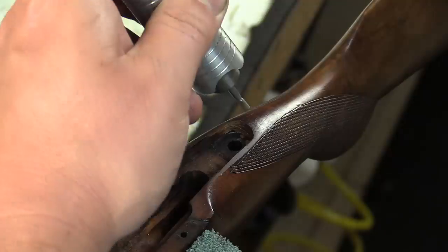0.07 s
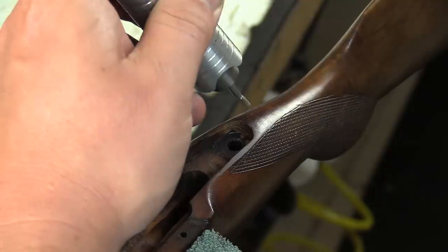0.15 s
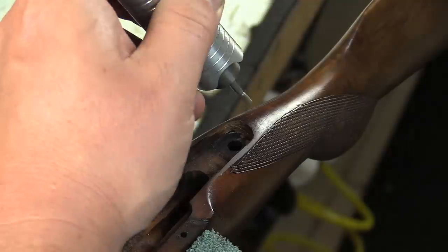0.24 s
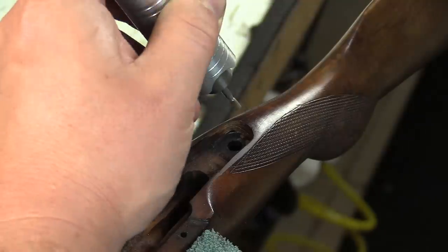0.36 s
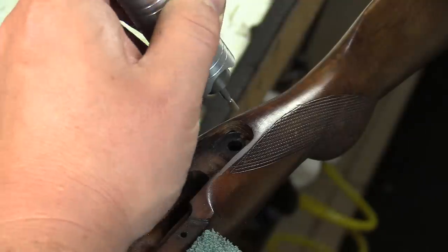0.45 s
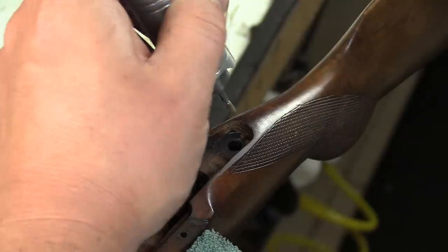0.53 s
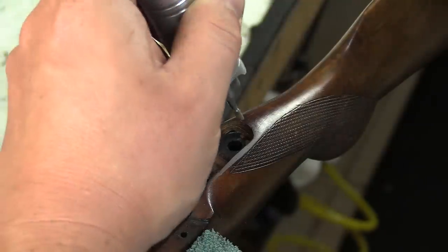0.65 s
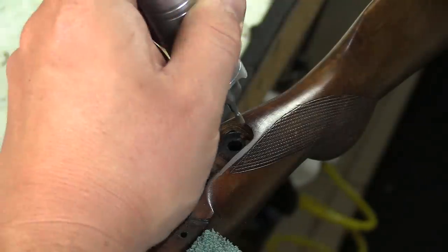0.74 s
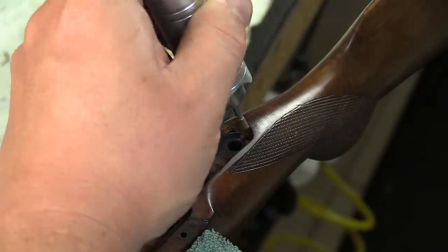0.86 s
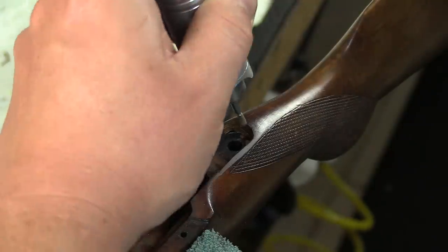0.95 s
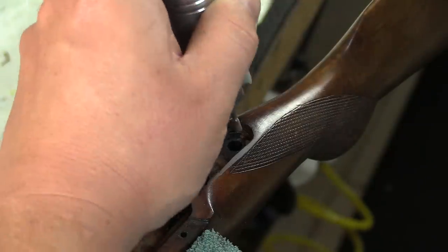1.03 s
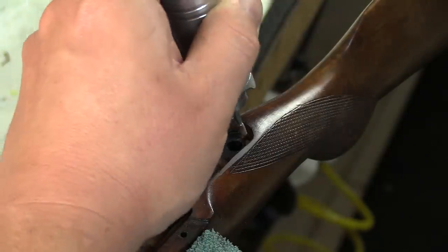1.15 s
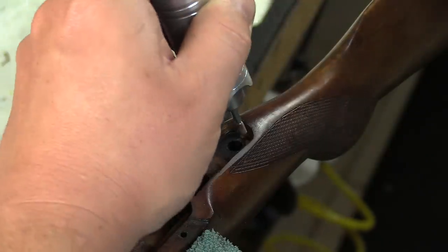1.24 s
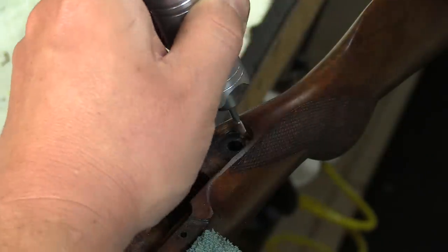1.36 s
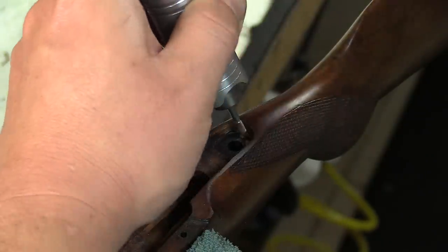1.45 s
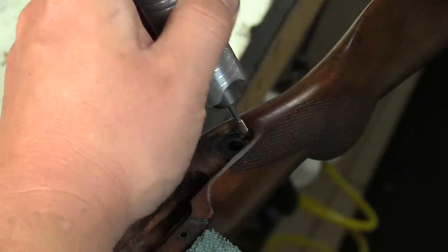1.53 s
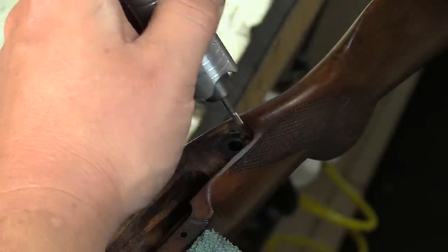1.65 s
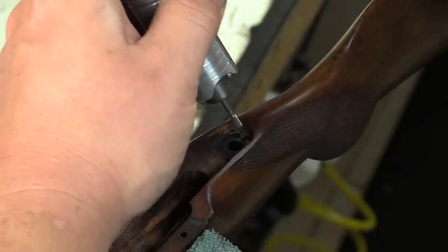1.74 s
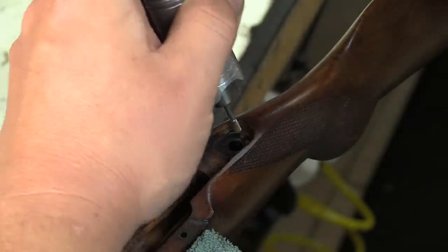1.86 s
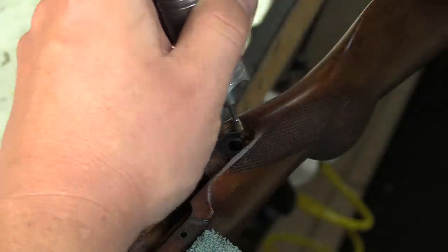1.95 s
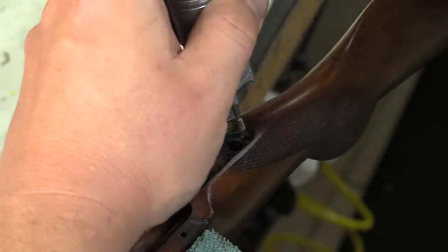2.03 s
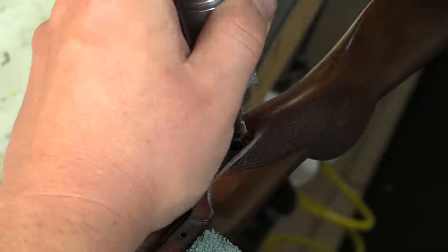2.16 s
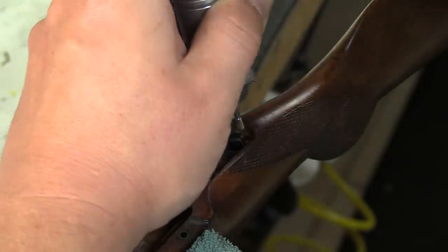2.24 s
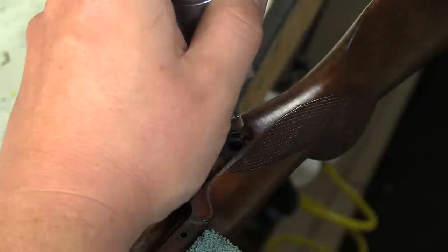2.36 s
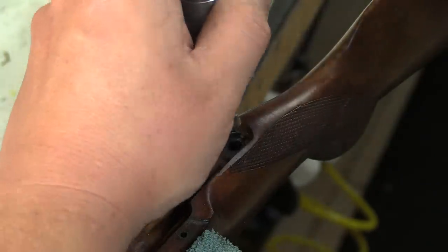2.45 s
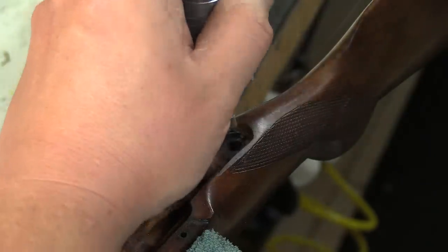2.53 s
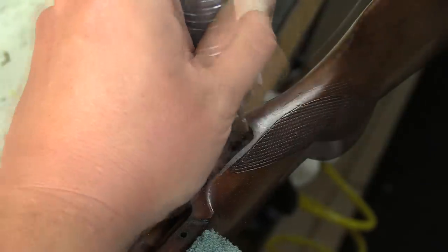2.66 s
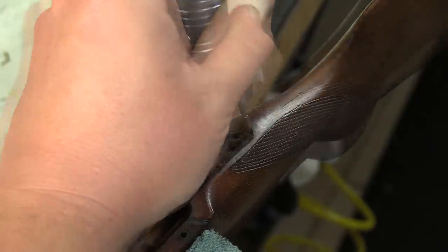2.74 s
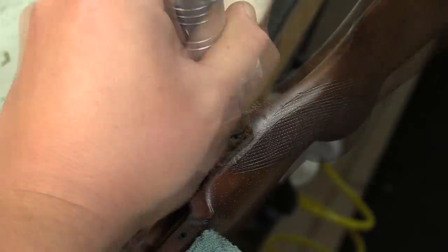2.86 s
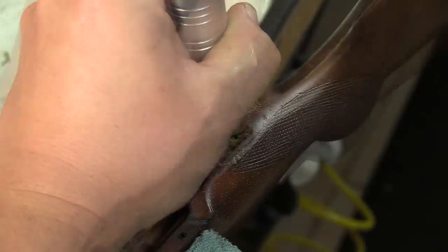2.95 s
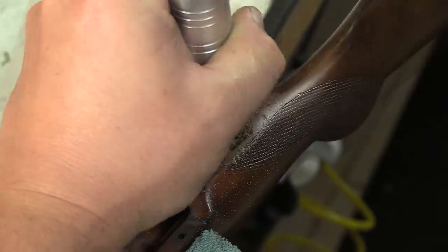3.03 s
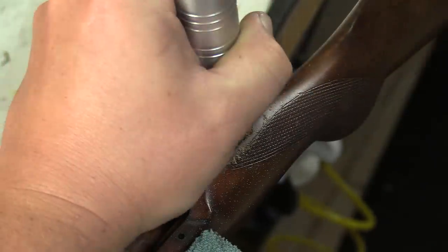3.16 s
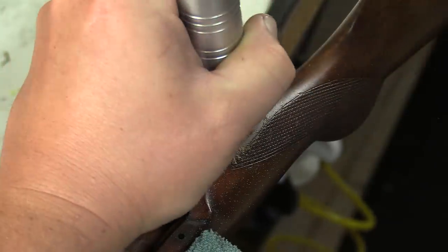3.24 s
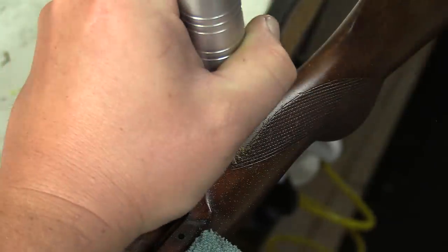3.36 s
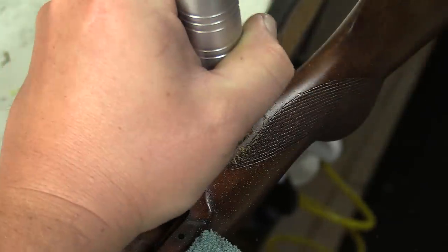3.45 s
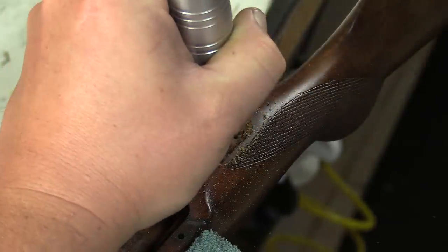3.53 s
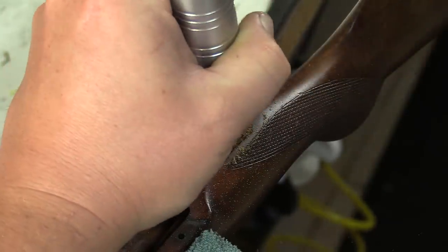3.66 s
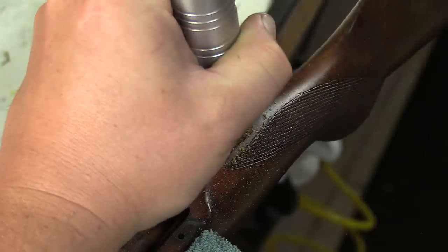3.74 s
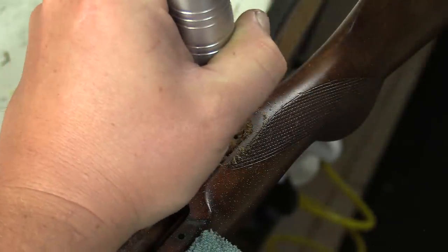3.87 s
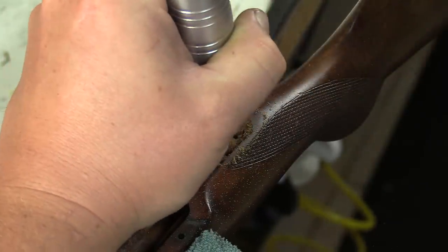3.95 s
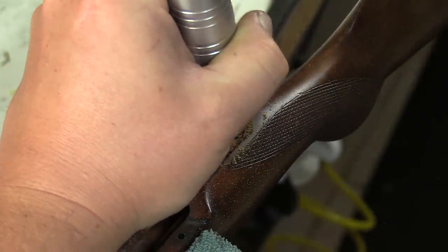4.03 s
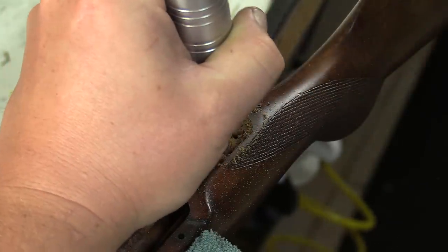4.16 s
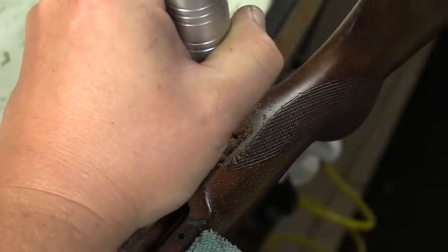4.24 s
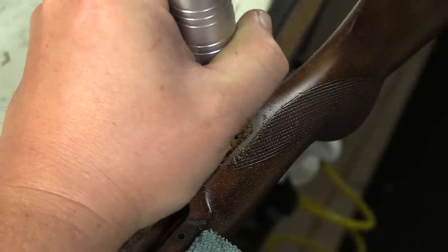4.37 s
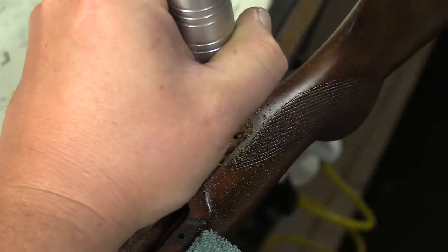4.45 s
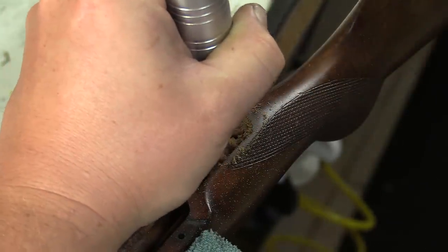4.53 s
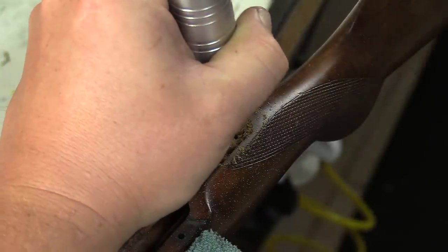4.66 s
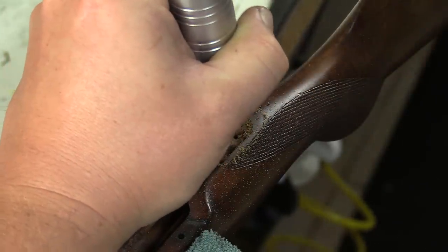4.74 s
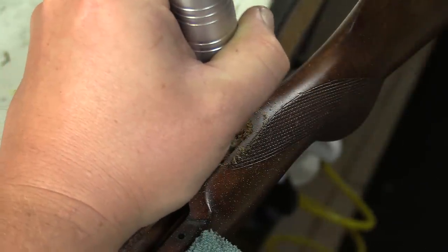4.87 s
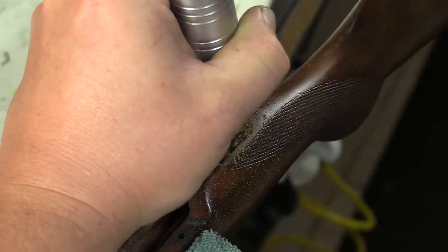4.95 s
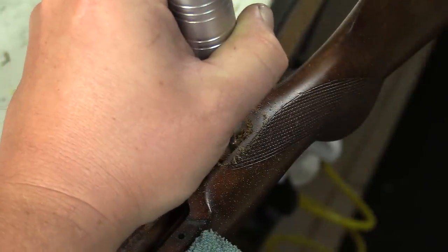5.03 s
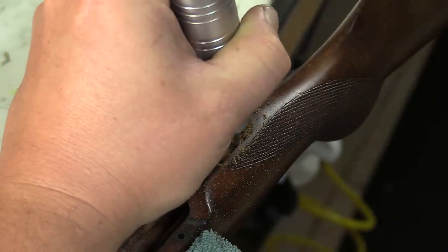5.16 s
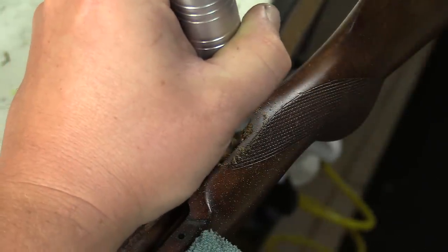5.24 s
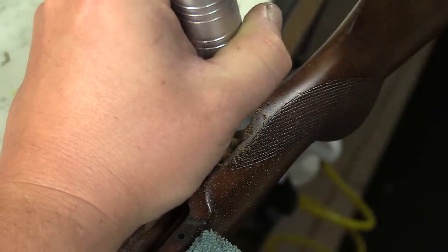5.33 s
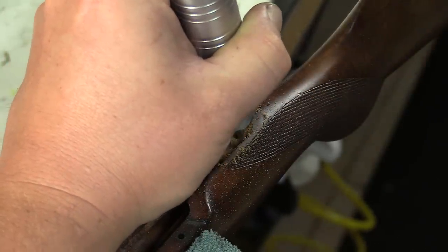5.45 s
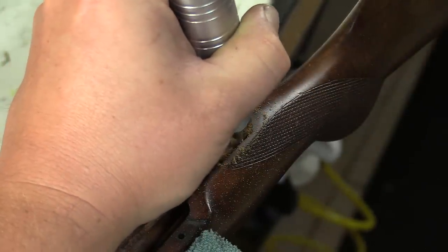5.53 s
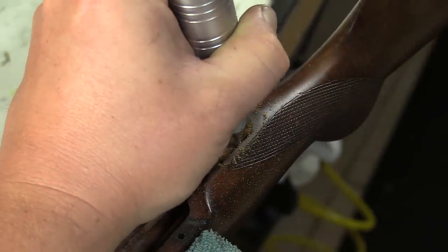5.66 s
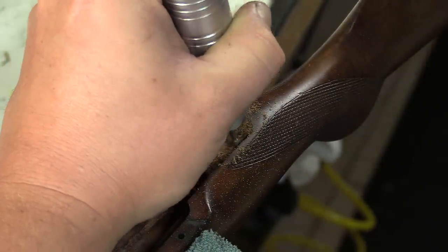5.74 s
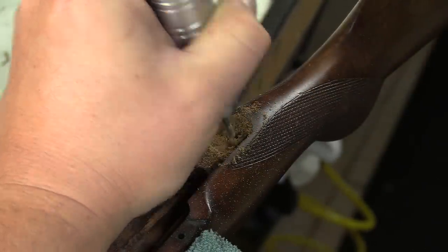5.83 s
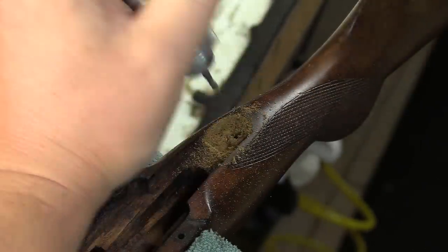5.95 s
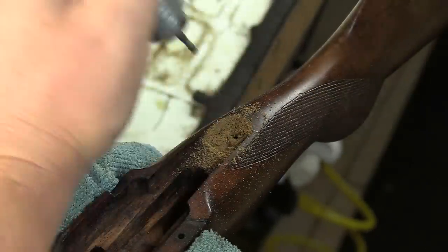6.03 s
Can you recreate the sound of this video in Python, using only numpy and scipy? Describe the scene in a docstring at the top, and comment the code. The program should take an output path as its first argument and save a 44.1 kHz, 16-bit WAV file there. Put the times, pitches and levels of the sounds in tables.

```python
"""Rotary tool carving wood

A hand-held rotary tool grinds a recess into a wooden stock, over a faint rumble.
First the motor creeps up to speed, its air hissing, as the burr skims the wood; this blends into a deep cut.
The motor is a stack of sines on its shaft orders; hiss, fizz and rasp are coloured noise pulsing once a turn.
Chatter and squeals are wavering sines locked to the burr; bites add buzzing scrapes and thuds."""
import sys
import numpy as np
from scipy import signal
from scipy.fft import rfft, irfft, next_fast_len
from scipy.io import wavfile
from scipy.ndimage import map_coordinates

SR = 44100
rng = np.random.default_rng(int(sys.argv[2]) if len(sys.argv) > 2 else 0)


def unload_wav(signal):
    """Save mono or channel-first audio to the path in sys.argv[1] as 16-bit WAV at rate SR, clipped to [-1, 1]."""
    wavfile.write(
        sys.argv[1],
        SR,
        np.round(np.clip(np.atleast_2d(signal).T, -1, 1) * 32767).astype(np.int16),
    )


N = 268789
TIME = np.arange(N) / SR  # seconds

# In these tables a half length is the spread of a bell-shaped swell. Colours are rescaled to rms 1 in use.
# Shaft orders as the motor gains speed. Each row: multiple of the turn (sounded at the nearest
# whole number), level at the start in dB, level change in dB per second.
RISING_ORDERS = [(1, -47.5, -3), (2, -51, 0.5), (4, -52, 2), (5, -51.5, 0), (6.03, -50.5, 1),
                 (6.85, -47.5, 0), (8, -49, 0), (12.1, -45, -1.5), (13, -51, 0), (18, -52, 0),
                 (22.1, -50.5, 1)]
# Shaft orders at full speed. Each row: multiple of the turn, level in dB.
FULL_ORDERS = [(1, -43.5), (2, -49.5), (3, -44.5), (4, -49), (5, -46.5), (6, -46), (12, -45), (13, -43.5),
               (44, -50)]
# The shrill order at full speed. Each row: time in seconds, level in dB.
SHRILL_LEVEL = [(4.4, -47), (5.0, -35), (5.5, -34), (6.09, -44)]
# Housing resonances the rising orders sweep through. Each row: centre in Hz, width in Hz, lift in dB.
HOUSING_MODES = [(583, 8.1, 6), (1775, 39, 6), (3180, 100, 7), (5780, 130, 11), (5870, 50, 5)]
# How deep the burr sits in the wood. Each row: time in seconds, depth from 0 to 1.
DEPTH = [(0.4, 0), (1.72, 0.24), (1.98, 0.5), (2.3, 0.45), (2.6, 0.85), (2.9, .78), (3.5, 0.97), (5.66, 1),
         (6.07, 0.42)]
# How far the hand covers the tool's nose in the light cut. Each row: time in seconds, cover from 0 to 1.
COVER = [(0, 0.1), (.33, 0.1), (.7, 0.86), (1.2, 0.96), (1.7, 0.25), (2.05, .5), (2.5, 0.8)]
# Wood and housing under each cut. Each row: frequency in Hz, relative level in dB per Hz.
LIGHT_BODY = [(25, -8.5), (100, -13), (165, -9.5), (230, -12), (400, -7), (700, -6), (1010, -1),
              (1500, -4.5), (2500, -3), (3250, -5.5), (4880, -7.5), (7500, -5.5), (9750, -36), (16000, -90)]
DEEP_BODY = [(25, -10.5), (100, -12.5), (170, -8), (260, -11.5), (420, -8), (720, -6.5), (1010, -3),
             (1590, -5), (2000, -6), (3000, -6), (5000, -9.5), (7500, -2), (9750, -28), (16000, -90)]
# Resonances of wood and housing. Each row: centre in Hz, width in Hz, lift in dB.
LIGHT_MODES = [(863, 46, 7.5), (1021, 63, 8.5), (1404, 98, -7), (1770, 190, 6), (2280, 90, -2.5),
               (2520, 120, -6.5), (6530, 180, -0.5)]
DEEP_MODES = [(582, 34, 7.5), (880, 100, 4.5), (1028, 67, 8), (1092, 22, 6), (1230, 17, 6.5),
              (1847, 120, 9), (1960, 60, 5), (2550, 230, -3.5), (2770, 150, 4), (5466, 41, 10.5),
              (6000, 340, 5)]
# The burr's hiss and its higher fizz. Each row: frequency in Hz, relative level in dB per Hz.
LIGHT_HISS = [(5500, -55), (7000, -17), (7700, -2.5), (8200, -1), (8420, 4.5), (8700, 1.5), (9500, 0.5),
              (10100, -3), (11000, -15), (12500, -60)]
DEEP_HISS = [(5500, -49), (7200, -38), (7700, -9.5), (8250, -3), (8520, 4), (8900, 1), (9500, -0.5),
             (10100, -9), (11000, -33), (12500, -60)]
LIGHT_FIZZ = [(8500, -60), (9900, -18), (10600, -1), (11300, 1.5), (11800, -0.5), (12250, -5), (12900, 1.5),
              (13700, -6), (14500, -2.5), (15200, -14), (16000, -23)]
DEEP_FIZZ = [(8500, -60), (9900, 4), (10400, 1.5), (10950, 2), (11330, 3), (11950, -4), (12600, 1.5),
             (13350, 7), (13900, 2.5), (14400, 0), (15100, -8), (16000, -9)]
# Bands shaped by the gap under the palm. Each row: centre open in Hz, centre covered in Hz,
# width in Hz, lift open in dB, lift covered in dB.
PALM_BANDS = [(4440, 5200, 420, 3, -6.5), (7400, 6800, 350, 5.5, -3.5), (9500, 10300, 320, -4, 4),
              (13800, 15200, 510, 4, -1.5)]
# Bands shaped by the mouth of the recess as the burr first sinks in, then by the recess itself.
# Each row: centre lifted in Hz, centre sunk in Hz, width in Hz, lift lifted in dB, lift sunk in dB.
MOUTH_BANDS = [(4440, 4500, 190, 1.5, -2), (5550, 5950, 420, -0.5, 8), (8400, 8400, 430, -1.5, 1.5),
               (11500, 10600, 500, 1.5, 1.5), (14700, 14000, 450, 1, -6)]
RECESS_BANDS = [(6070, 7300, 220, 7.5, 0), (6900, 6900, 390, -3, -3.5), (10600, 10050, 350, 3.5, -2),
                (12200, 14400, 610, -6, -6.5)]
# Partials of the rattle. Each row: multiple of the burr's turn, relative level in dB.
CHATTER_ORDERS = [(2, -21.5), (3, -2.5), (6, -7.5), (8, -11), (16, -20), (25, -0.5)]
# Bouts of the burr rattling in its hole. Each row: time in seconds, half length in seconds, level in dB.
RATTLES = [(2.884, 0.025, -33), (3.058, .028, -31.5), (3.367, 0.095, -36), (3.658, .022, -35),
           (5.093, 0.017, -35), (5.423, 0.032, -37), (5.559, 0.079, -37)]
# Short squeals of the burr. Each row: time in seconds, half length in seconds, level in dB,
# multiple of the turn.
SQUEALS = [(2.68, .05, -45, 8), (3.097, .03, -37, 8), (3.273, 0.014, -31.5, 8), (3.33, 0.018, -34, 8),
           (3.412, 0.022, -31.5, 8), (3.654, 0.014, -36, 8), (4.038, 0.014, -36, 8), (4.54, 0.017, -34, 16),
           (4.782, 0.011, -31, 17), (5.432, 0.02, -33, 8)]
# The burr catches the wall. Each row: time in seconds, half length in seconds, scrape level in dB,
# thud level in dB.
BITES = [(3.199, 0.0143, -19, -54), (3.254, 0.022, -20, -40.5), (3.378, 0.026, -12, -33.5),
         (3.72, 0.028, -17, -40), (3.774, 0.0165, -20.5, -58), (4.041, 0.018, -28, -40.5),
         (4.068, 0.016, -27, -55)]
# Spectra of scrape and thud. Each row: frequency in Hz, relative level in dB per Hz.
BITE_COLOUR = [(3000, -17), (5000, -16.5), (6600, -11), (7300, -7.5), (8000, 1.5), (8700, -1), (9600, 0.5),
               (11500, -3), (13300, -3.5), (15500, -17)]
THUD_COLOUR = [(25, -10), (70, -1), (170, 1), (500, 3), (1500, -16), (4000, -25), (8000, -40)]
# Soft knocks as the tool is lifted. Each row: start in seconds, level in dB.
KNOCKS = [(5.912, -23), (5.974, -18), (6.0, -21)]
# Spectrum of the background rumble. Each row: frequency in Hz, relative level in dB per Hz.
RUMBLE_COLOUR = [(20, -9), (45, -2), (85, -6.5), (300, -50)]
# The hand shifts its grip and rumbles. The row: time in seconds, half length in seconds, lift in dB.
REGRIP = (2.6, 0.16, 6.9)

FULL_HZ, WANDER_HZ = 336.25, 0.3  # turns per second at full speed, and their slow drift
SAG_FROM_S, SAG_HZ_PER_S = 5.93, 45
SHRILL_ORDER = 22
LIGHT_RASP_DB, LIGHT_HISS_DB, LIGHT_FIZZ_DB = -32, -32.5, -28.5  # burr running free
RASP_GROWS_DB, HISS_GROWS_DB, FIZZ_GROWS_DB = 3.5, 10, 8.5  # added at full depth
DEEP_RASP_DB, DEEP_HISS_DB, DEEP_FIZZ_DB = -27.5, -24, -21  # burr fully sunk, before hand pressure
HISS_FALLS_DB, FIZZ_FALLS_DB = 10, 8.5  # lost as it comes out
BITE_FIZZ_DB = 0.5  # lift while the burr is caught
RATTLE_DB, RATTLE_STROKE_DB = -40, 2  # steady rattle; its rise on each push
TOP_HZ = 15690  # band limit


def motor(turn, levels, waver_db):
    """Clean shaft orders; the higher ones waver more as the hand moves around the housing."""
    whine = 0
    for multiple, db in levels:
        waver = waver_db * min(multiple / 8, 1) * wobble(11)
        whine = whine + amp(db + waver) * tone(turn, multiple)
    return whine


def scraping(turn, swing_db, grain_db):
    """Grainy noise of chips and whirled air, strongest once in each turn of the off-centre burr."""
    contact = unit(sum(np.cos(k * turn) / k for k in range(1, 5)))
    grain = grain_db * wobble(900)
    return unit(rng.standard_normal(N) * amp(swing_db * contact + grain))


def light_cut():
    """The motor nears its speed exponentially; air and first contact hiss in step with the shaft."""
    speed = 305.5 - 46.3 * np.exp(-TIME / 1.6)  # turns per second
    turn = angle(speed)
    depth, = curves(DEPTH)
    cover, = curves(COVER)
    chips = lambda: scraping(turn, swing_db=1.0, grain_db=0.84)

    rasp_db = LIGHT_RASP_DB + RASP_GROWS_DB * depth
    hiss_db = LIGHT_HISS_DB + HISS_GROWS_DB * depth + 0.93 * wobble(30.18)
    fizz_db = LIGHT_FIZZ_DB + FIZZ_GROWS_DB * depth ** 2 + 0.8 * wobble(30.1)
    rasp = amp(rasp_db) * coloured(chips(), LIGHT_BODY, LIGHT_MODES)
    hiss = amp(hiss_db) * coloured(chips(), LIGHT_HISS)
    fizz = amp(fizz_db) * coloured(chips(), LIGHT_FIZZ)

    levels = [(k, db + slope * TIME + resonances(k * speed, HOUSING_MODES))
              for k, db, slope in RISING_ORDERS]
    whine = motor(turn, levels, waver_db=3.0)
    under_palm = cavity(rasp + hiss + fizz + whine, PALM_BANDS, cover, drift_db=1.24)
    return cavity(under_palm, MOUTH_BANDS, depth, drift_db=0.83)


def deep_cut():
    """The full-speed motor holds nearly steady until a last sag; the burr lags and wavers under load."""
    speed = FULL_HZ + WANDER_HZ * wobble(3) - SAG_HZ_PER_S * np.maximum(TIME - SAG_FROM_S, 0)
    depth, = curves(DEPTH)
    shrill_db, = curves(SHRILL_LEVEL)
    stroke = strokes()
    caught = np.minimum(sum(swell(s, 1.5 * half) for s, half, *_ in BITES), 1)

    # each push slows the burr; a catch slows it too and calms its wavering
    waver_hz = 2.8 * wobble(45) + 2 * wobble(14) + 7 * (0.35 - stroke)
    burr = angle(speed - 4 * caught + (1 - 0.8 * caught) * waver_hz)
    pressure_db = 0.5 * wobble(35) + 0.5 * stroke
    chips = lambda: scraping(burr, swing_db=1.5, grain_db=0.96)

    rasp_db = DEEP_RASP_DB + pressure_db
    hiss_db = DEEP_HISS_DB - HISS_FALLS_DB * (1 - depth) + pressure_db
    fizz_db = DEEP_FIZZ_DB - FIZZ_FALLS_DB * (1 - depth) + BITE_FIZZ_DB * caught
    fizz_db = fizz_db + pressure_db + 0.7 * wobble(25)
    rasp = amp(rasp_db) * coloured(chips(), DEEP_BODY, DEEP_MODES)
    hiss = amp(hiss_db) * coloured(chips(), DEEP_HISS)
    fizz = amp(fizz_db) * coloured(chips(), DEEP_FIZZ)

    whine = motor(angle(speed), list(FULL_ORDERS) + [(SHRILL_ORDER, shrill_db)], waver_db=1.5)
    hum = filtered(whine, lambda hz: hz < 500)
    whine = whine - 0.8 * np.maximum(stroke, 0.7 * caught) * hum  # strokes and catches damp the shaft
    in_recess = rasp + hiss + fizz + whine + chatter(burr)
    return cavity(in_recess, RECESS_BANDS, depth, drift_db=0.67) + bites(burr)


def chatter(turn):
    """The burr hops against the wood in step with its turns, at times rising to a rough squeal."""
    bouts = sum(amp(db) * swell(s, half) for s, half, db in RATTLES)
    strength = amp(RATTLE_DB + RATTLE_STROKE_DB * strokes()) + bouts
    rattle = sum(amp(db + 3.5 * wobble(70)) * tone(turn + 0.1 * wobble(60), k)
                 for k, db in CHATTER_ORDERS)

    skid = turn + 0.035 * wobble(220)  # the hops land unevenly
    grip = unit(amp(2.2 * wobble(150)))
    squeal = 0
    for s, half, db, k in SQUEALS:
        pitch = tone(skid, k) + amp(-3) * tone(skid, 2 * round(k))  # with its octave
        squeal = squeal + amp(db) * swell(s, half) * pitch
    return strength * rattle + grip * squeal


def bites(turn):
    """A catching burr strikes on every turn: a buzzing scrape and a thud in the stock."""
    buzz = unit(sum(amp(2 * wobble(60)) * tone(turn, k) for k in range(20, 28)))
    scrape = coloured(0.45 * buzz + scraping(turn, swing_db=1, grain_db=1.8), BITE_COLOUR)
    thud = coloured(scraping(turn, swing_db=1, grain_db=3), THUD_COLOUR)
    return sum(swell(s, half) * (amp(db) * scrape + amp(thud_db) * thud)
               for s, half, db, thud_db in BITES)


def strokes():
    """The hand scrubs to and fro about six times a second, most in mid deep cut: 0-1."""
    push = (0.5 + 0.5 * np.cos(2 * np.pi * 5.95 * (TIME - 4.8))) ** 2
    return push * np.interp(TIME, [2.8, 3.6, 5.1, 5.4], [0.3, 1, 1, 0.2])


def cavity(x, bands, closure, drift_db):
    """Gaps between hand, tool and stock: broad peaks and hollows slide with closure (0-1) and drift."""
    hz, t, spectrum = signal.stft(x, SR, nperseg=512)
    closed = np.interp(t, TIME, closure)
    knots = rng.standard_normal((40, 40))  # one every 600 Hz, five a second
    lift_db = drift_db * map_coordinates(knots, np.meshgrid(hz / 600, t * 5, indexing="ij"))
    for open_hz, closed_hz, width_hz, open_db, closed_db in bands:
        centre_hz = open_hz + (closed_hz - open_hz) * closed
        offset = (hz[:, None] - centre_hz) / width_hz
        peak_db = open_db + (closed_db - open_db) * closed
        lift_db = lift_db + peak_db * np.exp(-0.5 * offset ** 2)
    return signal.istft(spectrum * amp(lift_db), SR, nperseg=512)[1][:N]


def knocks(ring_hz, t60):
    """Dull, short taps on the wood: a soft-edged sine dying 60 dB in t60 seconds."""
    taps = 0
    for s, db in KNOCKS:
        age = np.maximum(TIME - s, 0)
        onset = 1 - np.exp(-age / 0.0027)
        taps = taps + amp(db - 60 * age / t60) * onset * np.sin(2 * np.pi * ring_hz * age)
    return taps


def background_rumble(share):
    """Low noise, a little louder with the deep cut's share (0-1), swelling as the hand regrips."""
    s, half, lift_db = REGRIP
    level_db = -58.5 + 2.6 * share + lift_db * swell(s, half) + 1.5 * wobble(3.95)
    return amp(level_db) * coloured(rng.standard_normal(N), RUMBLE_COLOUR)


def amp(db):
    """Decibels to gain."""
    return 10 ** (np.asarray(db) / 20)


def unit(x):
    """Scale to rms 1."""
    return x / np.sqrt(np.mean(x ** 2) + 1e-20)


def curves(rows):
    """One value per sample for each column after the time."""
    s, *cols = np.transpose(rows)
    return [np.interp(TIME, s, c) for c in cols]


def wobble(rate):
    """A smooth random curve, rate knots a second."""
    return map_coordinates(rng.standard_normal(int(N * rate / SR) + 4), [TIME * rate])


def swell(s, half):
    """A bell-shaped rise and fall around time s."""
    return np.exp(-0.5 * ((TIME - s) / half) ** 2)


def angle(speed):
    """Shaft angle in radians from turns per second."""
    return 2 * np.pi * np.cumsum(speed) / SR


def tone(turn, multiple):
    """One shaft order, at the nearest whole multiple and rms 1."""
    return np.sqrt(2) * np.sin(round(multiple) * turn + rng.uniform(0, 2 * np.pi))


def resonances(hz, modes):
    """Lift in dB that narrow resonances give to a frequency."""
    return sum(lift / (1 + (2 * (hz - centre) / width) ** 2) for centre, width, lift in modes)


def filtered(x, response):
    """x times a response of frequency."""
    m = next_fast_len(N + 8192)  # room for the filter to ring out
    return irfft(rfft(x, m) * response(np.fft.rfftfreq(m, 1 / SR)), m)[:N]


def coloured(x, points, modes=()):
    """x through a broad spectrum with narrow resonances on it, at rms 1."""
    f, db = np.transpose(points)
    broad = lambda hz: np.interp(np.log(hz + 1), np.log(f), db)
    return unit(filtered(x, lambda hz: amp(broad(hz) + resonances(hz, modes))))


def scene():
    """The light cut blends into the deep one at constant power, over knocks and a faint rumble."""
    share = np.clip((TIME - 2.5) / 0.74, 0, 1)
    tool = np.sqrt(1 - share) * light_cut() + np.sqrt(share) * deep_cut()
    mono = tool + background_rumble(share) + knocks(ring_hz=669, t60=0.057)
    return np.array([mono, mono])


def record(dry):
    """Soft saturation rounds off the highest peaks, then everything above the band limit is cut."""
    rounded = dry / (1 + (dry / 0.76) ** 6) ** (1 / 6)
    return np.array([filtered(channel, lambda hz: hz < TOP_HZ) for channel in rounded])


dry = scene()
out = record(dry)
unload_wav(out)
```